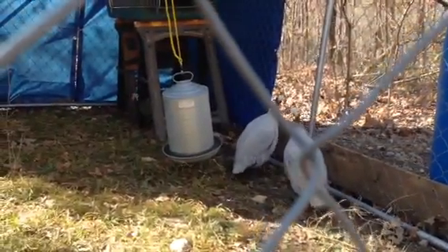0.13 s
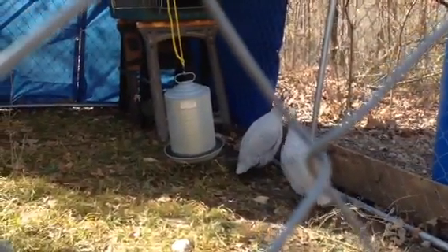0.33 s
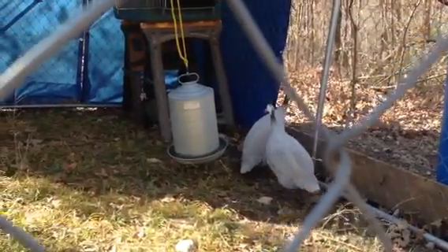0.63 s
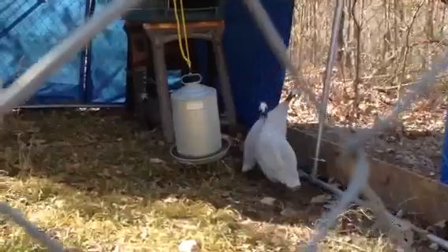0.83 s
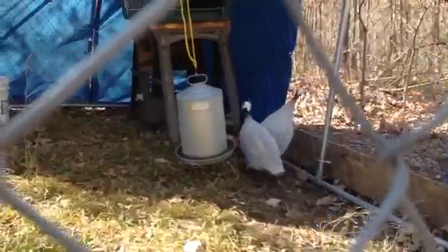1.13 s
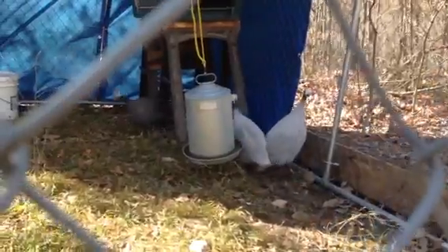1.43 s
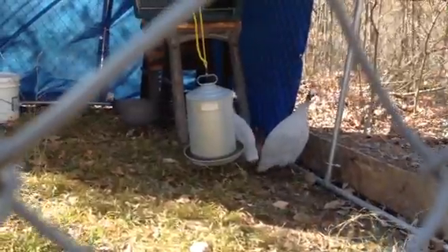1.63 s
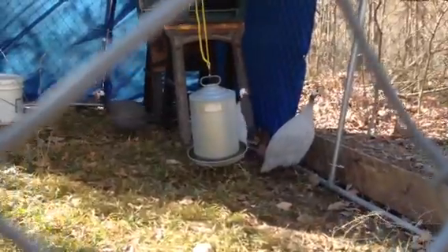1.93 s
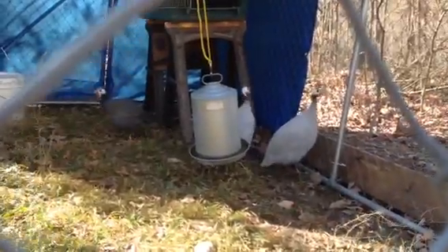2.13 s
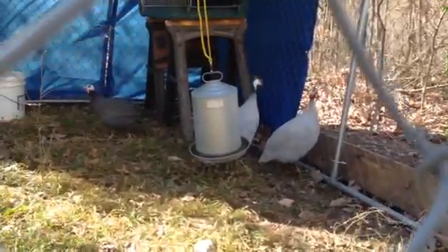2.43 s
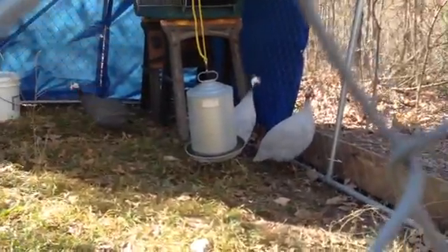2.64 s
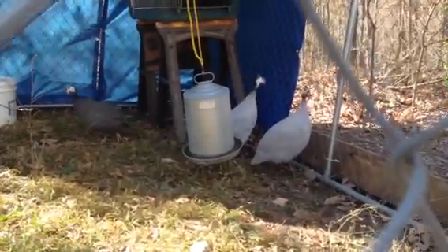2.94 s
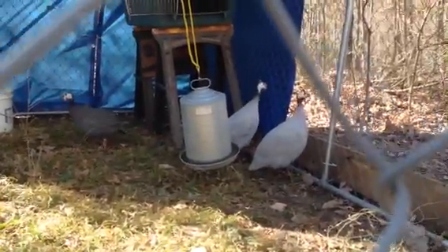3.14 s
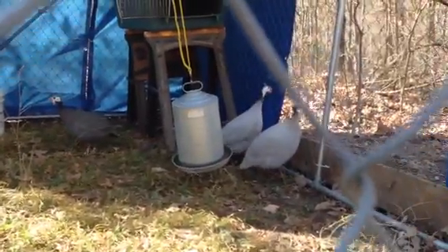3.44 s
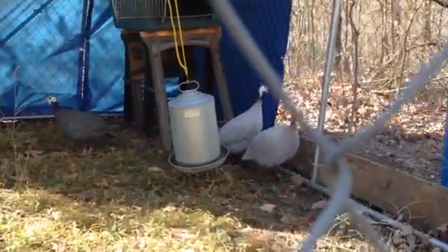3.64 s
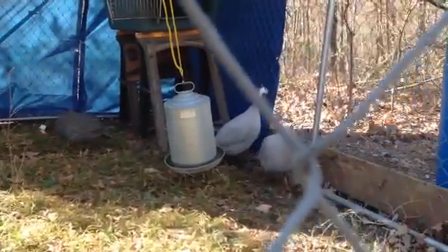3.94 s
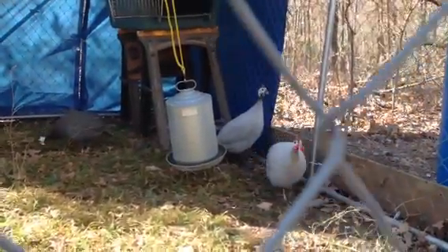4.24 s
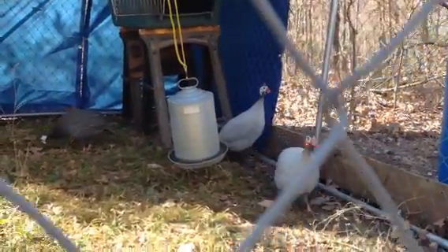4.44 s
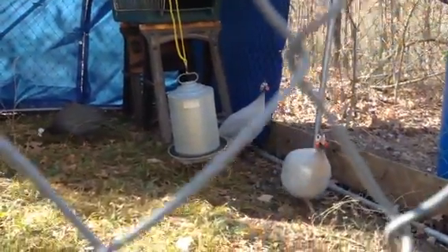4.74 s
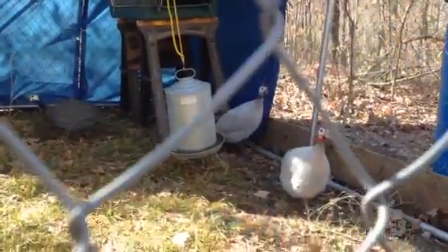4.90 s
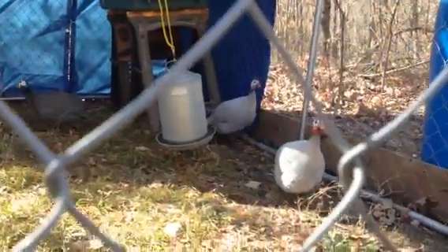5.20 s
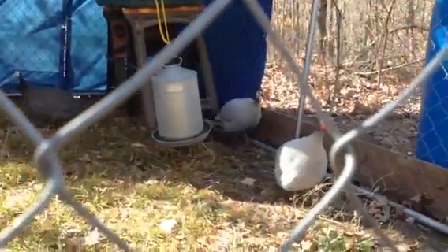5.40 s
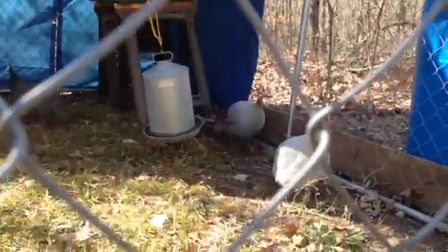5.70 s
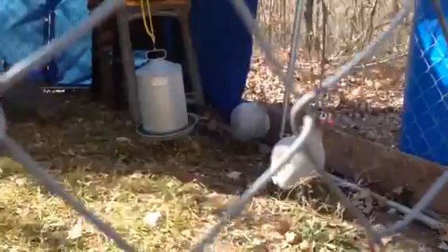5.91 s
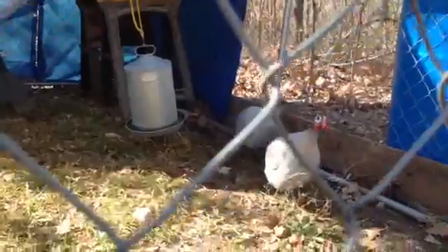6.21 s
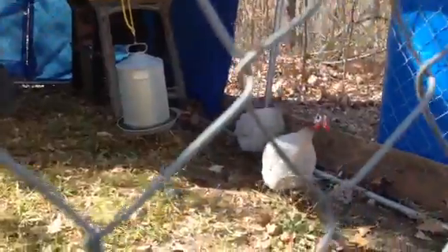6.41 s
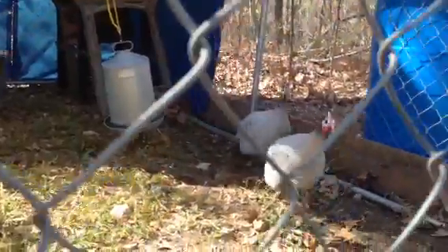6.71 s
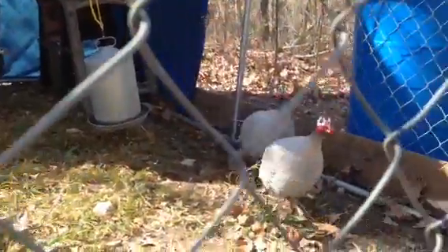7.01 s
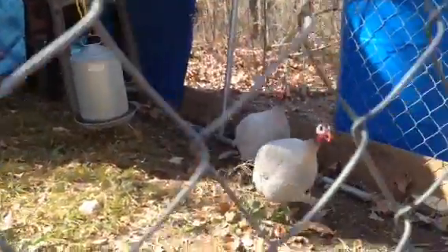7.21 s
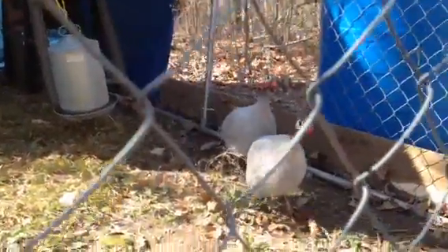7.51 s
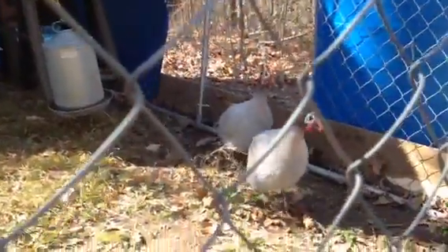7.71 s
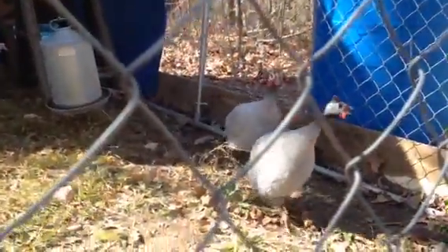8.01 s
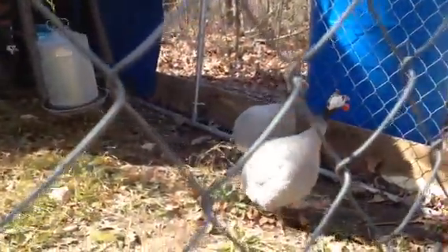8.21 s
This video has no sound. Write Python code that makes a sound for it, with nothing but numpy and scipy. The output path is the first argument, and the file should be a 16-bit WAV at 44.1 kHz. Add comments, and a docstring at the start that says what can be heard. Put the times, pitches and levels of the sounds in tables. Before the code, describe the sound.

Guinea fowl chirp and cluck softly in a small pen, purr briefly, then burst into a long harsh rattling trill with screeches.

```python
"""Guinea fowl in a tarp-walled pen: rising chirps made of whistles and quick pings, then dry clucks from puffs
of air and a soft purr of slower pings. More chirps follow, then a long rattling trill in two parts, about a
hundred pings a second, with screeches of rough air at its peaks. Throughout, noise bursts scratch in dry leaves,
short low thumps bump the hand-held camera, and the pen adds a short echo over a quiet rumble and hiss."""
import sys
import numpy as np
from scipy import signal
from scipy.fft import rfft, irfft, next_fast_len
from scipy.io import wavfile
from scipy.ndimage import uniform_filter1d, map_coordinates

SR = 44100
rng = np.random.default_rng(int(sys.argv[2]) if len(sys.argv) > 2 else 0)


def waveform_to_disk(signal):
    """Save audio, clipped to [-1, 1], as 16-bit WAV at the path in sys.argv[1]."""
    frames = np.transpose(np.atleast_2d(signal))
    scaled = np.clip(frames, -1, 1) * 32767
    samples = np.round(scaled).astype(np.int16)
    wavfile.write(sys.argv[1], SR, samples)


N = 368235
TIME = np.arange(N) / SR

# All levels in the tables are relative: later filters and mixing scale them.
# Throat tables list resonances; each is applied twice, which narrows it.
# throat resonances for the pings of the chirps and first trill: centre_hz, width_hz, level_db
PING_THROAT = [(2350, 410, 0), (2790, 127, 7.5), (3334, 205, -1.5), (3846, 400, 2.5), (4540, 1100, -4.5),
               (5630, 260, 3), (6210, 720, 0.5)]
# throat resonances for the rasp of chirps and trills: centre_hz, width_hz, level_db
TRILL_THROAT = [(363, 37, -8.5), (980, 78, -19.5), (1579, 107, 5.5), (2323, 320, -0.5), (2900, 100, -11),
                (3130, 270, -8), (4420, 1260, -4.5), (5260, 840, -6.5), (6350, 310, -15)]


def chirps():
    """A faint, shaky whistle slides up and breaks into a few quick pings, hoarse at their peak."""
    # one row per chirp: start_s, flutter_db, top_pitch_hz, rasp_db
    chirp_list = [(.001, -56.5, 3700, -69), (0.258, -47, 3560, -64), (0.388, -52.5, 3730, -66),
                  (0.599, -48, 3600, -49), (0.775, -44, 3650, -66), (0.98, -48.5, 3740, -74),
                  (1.102, -46, 3920, -49.5), (1.26, -44, 3740, -50), (1.45, -48.5, 3430, -67),
                  (3.104, -41.5, 3660, -52), (3.312, -39, 3800, -44.5), (3.6, -45, 3600, -43),
                  (3.871, -57.5, 2900, -66), (5.341, -61.5, 3100, -66), (5.552, -52, 3710, -73),
                  (5.865, -40, 3700, -66)]
    whistle, flow, force, cycles, pitch = np.zeros((5, N))
    t = np.arange(SR // 10) / SR
    whistle_shape = amp(np.interp(t, [0, .005, .016, .028, .05], [-17, -6, 0.5, -10.5, -60]))
    swell = amp(np.interp(t, [0, .012, .02, .04, .055, .075, .1], [-66, -18, -7, -8.0, -12.5, -34, -73]))
    hoarse = np.exp(-((t - .026) / 0.0073) ** 2)
    whistle_hz = np.interp(t, [0, .01, .028], [2050, 2300, 3100])
    phase = 2 * np.pi * np.cumsum(whistle_hz) / SR
    # the octave joins in at the hoarse moment
    whistle_wave = whistle_shape * (np.sin(phase) + hoarse * np.sin(2 * phase))
    for s, db, top_hz, rasp_db in chirp_list:
        add(whistle, s, amp(db - 8.5) * whistle_wave)
        add(cycles, s, 112 * t)  # 112 pings per second
        add(pitch, s, np.interp(t, [.01, .024], [2800, top_hz]))
        add(force, s, amp(db) * swell)
        add(flow, s, amp(rasp_db) * hoarse)
    shake = 1 + .6 * wobble(350)
    flutter = pings(cycles, pitch, PING_THROAT, length=.0008, sweep=.08,
                    click_db=-4, ring_db=-8, direct_db=-3)
    return shake * whistle + force * flutter + rasp(flow, TRILL_THROAT)


def clucks():
    """Short runs of puffs through the throat, swelling or fading, and a few pure pips."""
    # runs of puffs: start_s, puff_count, gap_s, first_puff_db, last_puff_db
    cluck_runs = [(.823, 2, 0.012, -49, -53), (1.034, 1, .02, -55, -51.5), (1.139, 2, .017, -55, -43.5),
                  (1.586, 2, .02, -41, -49.5), (1.692, 4, 0.021, -44.5, -51), (1.819, 4, 0.022, -48, -40.5),
                  (1.911, 4, 0.023, -45.5, -45), (2.002, 2, 0.024, -36.5, -40),
                  (2.075, 2, 0.0157, -39, -31.5), (2.189, 2, 0.016, -40, -36), (3.146, 2, .023, -43.5, -48),
                  (3.369, 1, .02, -38.5, -36)]
    # sharp pure tones: middle_s, level_db, pitch_hz, length_s
    pips = [(0.052, -46.5, 2310, 0.0023), (0.832, -37.5, 4170, 0.0026), (1.67, -45.5, 2390, 0.0043),
            (2.408, -43.5, 2500, 0.0026), (2.212, -43, 932, 0.01), (3.3674, -25, 4320, 0.002),
            (3.374, -47, 1520, 0.0033), (3.631, -46.5, 1550, 0.01), (7.725, -25, 2474, 0.005)]
    # throat resonances when clucking: centre_hz, width_hz, level_db
    cluck_throat = [(342, 46, -4.5), (924, 143, -11.5), (1472, 119, 7), (1890, 170, -12), (2400, 390, 4),
                    (2956, 92, -4), (3240, 240, -3.5), (3720, 310, -7), (4254, 430, 2.5), (4750, 700, -7.5),
                    (5680, 550, -6.5)]
    puff_s, width_spread, scatter_db = .0045, .25, 0.5  # typical puff width, and how much puffs differ
    flow, tone = np.zeros((2, N))
    u = np.arange(-SR // 30, SR // 30) / SR
    for s, count, gap, first_db, last_db in cluck_runs:
        for k, db in enumerate(np.linspace(first_db, last_db, round(count))):
            size, width = rng.standard_normal(2)
            this_puff_s = puff_s * np.exp(width_spread * width)
            puff = amp(db + scatter_db * size) / np.cosh(1.8 * u / this_puff_s)
            add(flow, s + k * gap + u[0] - .001, puff)
    for s, db, hz, length in pips:
        pip = np.exp(-(u / length) ** 2) * np.sin(2 * np.pi * hz * u)
        add(tone, s + u[0], amp(db) * pip)
    return amp(0.5) * rasp(flow, cluck_throat) + tone


def purr():
    """A slow train of soft pings with a husky breath, which turns raspy in short churrs."""
    # level of the purr over time: time_s, effort_db
    purr_effort = [(2.35, -72), (2.404, -53.5), (2.46, -61), (2.742, -49.5), (2.748, -59), (2.94, -59),
                   (2.964, -64), (3.168, -45), (3.22, -67)]
    # raspy spells: start_s, length_s, level_db
    churrs = [(2.765, 0.051, -48.5), (2.85, .11, -48), (3.028, 0.035, -48.5), (3.135, 0.055, -49.5)]
    # throat resonances when churring: centre_hz, width_hz, level_db
    purr_throat = [(940, 70, -8), (1430, 137, 6.5), (2184, 320, -0.5), (2420, 76, -12), (2950, 230, -4.5),
                   (4100, 980, -9.5), (4780, 320, -16), (5500, 740, -16)]
    start_s, first_pace, slowing = 2.349, 52.3, 2.5  # pings per s at the start, pings per s lost each second
    age = np.maximum(TIME - start_s, 0)
    cycles = first_pace * age - slowing * age ** 2 / 2
    tone = pulses(cycles, np.full(N, 2500), length=0.0047, sweep=0.02, skirt=0.087,
                  jitter=.0003, scatter_db=3.5)
    husk = rasp(puffs(cycles, sharp=0.37), [(2385, 350, -3), (4140, 550, -19), (5400, 540, -20)])
    churr_gain = spells(churrs, attack=0.021, release=0.014)
    flow = churr_gain * puffs(cycles, sharp=1.06) * amp(wobble(40))
    return amp(phrases([purr_effort]) - 4) * (tone + amp(-2.0) * husk) + rasp(flow, purr_throat)


def trill():
    """Fast pings drag a rasp and a shrill ring as the beak opens, and screech at the peaks."""
    # force behind the pings, one list per trill: time_s, effort_db
    trill_effort = [
        [(5.96, -63.5), (6.48, -45), (6.61, -51), (6.698, -42), (6.752, -47), (7.126, -41), (7.144, -39.5),
         (7.206, -45), (7.412, -35.5), (7.434, -27.5), (7.514, -32.5), (7.56, -71)],
        [(7.68, -68), (7.696, -33), (7.742, -36.5), (7.794, -45), (7.958, -39.5), (8.04, -45), (8.318, -37.5),
         (8.35, -41)],
    ]
    # how far the beak opens, one list per trill: time_s, rasp_db
    beak = [
        [(6.78, -80), (6.838, -54), (6.942, -86), (7.0, -60.5), (7.104, -76), (7.124, -45), (7.146, -42.5),
         (7.274, -73), (7.334, -43), (7.356, -54), (7.512, -43), (7.56, -72)],
        [(7.68, -90), (7.704, -41), (7.716, -35), (7.844, -86.5), (8.054, -43), (8.076, -52), (8.226, -39.5),
         (8.316, -50.5), (8.35, -52)],
    ]
    # pitch of the pings: time_s, pitch_hz
    trill_pitch = [(5.96, 2430), (6.08, 3000), (6.34, 3480), (6.55, 3283), (6.9, 3556), (7.27, 3450),
                   (7.47, 4050), (7.685, 3270), (7.74, 4250), (7.95, 3338), (8.12, 3440), (8.35, 3880)]
    # each trill starts fast and slows: time_s, pings_per_s
    trill_pace = [(5.95, 124), (6.2, 124), (6.38, 110), (6.85, 104), (7.54, 95), (7.68, 115), (7.92, 111),
                  (8.35, 94)]
    # resonances for the second trill's pings, the throat held differently: centre_hz, width_hz, level_db
    late_throat = [(2494, 200, 3.5), (2840, 110, -1.5), (3350, 185, 2.5), (3950, 360, 2), (4670, 720, -9),
                   (6100, 1300, -5)]
    # the open beak's ring: centre_hz, width_hz, level_db
    shrill_ring = [(4776, 290, 3.5), (5330, 250, -18)]
    # screeches: start_s, length_s, level_db
    screeches = [(7.135, 0.017, -42.5), (7.475, 0.041, -29), (7.715, 0.032, -31), (8.203, 0.024, -44),
                 (8.32, 0.033, -34.5)]
    # throat resonances when screeching: centre_hz, width_hz, level_db
    screech_throat = [(341, 73, -0.5), (634.6, 138, -8), (895, 118, 1), (1860, 250, 2.5), (2450, 175, 8),
                      (3130, 150, -3), (4010, 760, 7.5), (4720, 880, -0.5), (5350, 190, 3.5),
                      (5840, 1200, -11), (7680, 1450, -19.5)]
    effort_db, rasp_db = phrases(trill_effort), phrases(beak)
    pitch, = curves(trill_pitch)
    pace, = curves(trill_pace)
    cycles = np.cumsum(pace * (1 + .008 * wobble(40))) / SR  # the pace wanders slightly
    early, late = [pings(cycles, pitch, modes, length=0.00031, sweep=0.11,
                         click_db=-11, ring_db=-11, direct_db=-12.5)
                   for modes in (PING_THROAT, late_throat)]
    throat_change_s = 7.62  # in the pause between the trills
    core = np.where(TIME < throat_change_s, early, late)
    flow = puffs(cycles, sharp=0.69)
    hoarse = rasp(amp(rasp_db + 5.0) * flow, TRILL_THROAT)
    opening = np.clip((rasp_db + 72.5) / 15, 0, 1)
    from_beak = .55  # the shrill ring follows partly the beak, partly the effort
    shrill_db = -1.5 + from_beak * rasp_db + (1 - from_beak) * effort_db
    shrill_db += 3.5 * (TIME > throat_change_s)  # it rings harder in the second trill
    shrill = rasp(opening * amp(shrill_db) * flow, shrill_ring)
    screech_gain = spells(screeches, attack=0.0087, release=0.0034)
    screech = rasp(screech_gain * flow, screech_throat)
    voice = amp(effort_db - 0.5) * core + hoarse + shrill + screech
    stretch_s = .0006 * wobble(9)  # the moving neck bends the whole sound a little
    return map_coordinates(voice, [(TIME + stretch_s) * SR], order=3)


def leaves():
    """Feet rake crackling leaves, scuff the soil below and snap twigs, all as shaped noise."""
    # scratches: start_s, level_db, decay_s, soil_db (relative to the leaves)
    scratches = [(0.099, -56.5, 0.0065, -7), (0.409, -40.5, 0.019, -12.5), (0.423, -43.5, 0.022, -19),
                 (.47, -59.5, 0.07, -4), (0.882, -57.5, 0.044, -8), (1.2, -74, 0.12, 1),
                 (3.509, -60, 0.052, 2.5), (3.735, -63, 0.028, 5), (3.785, -57.5, 0.037, -0.5),
                 (3.98, -61, 0.028, -8.5), (4.905, -52, 0.011, -9), (6.388, -56.5, 0.011, -4.5),
                 (6.826, -59.5, 0.017, 4.5)]
    # spells of restless feet: start_s, length_s, level_db
    stir = [(0, 1.5, -64.5), (2.25, 1.6, -69.5), (6.55, .95, -60.5), (8.15, .2, -65)]
    # twigs snapping: start_s, level_db
    ticks = [(1.529, -50), (3.306, -47), (3.405, -49.5)]
    # colour of the leaves: frequency_hz, level_db (per Hz)
    leaf_colour = [(150, -57), (250, -42), (411, -6), (699, -14), (858, -8), (1170, -14.5), (1430, -8.5),
                   (1760, -33), (2090, -17), (2850, -22.5), (5550, -1.5), (9940, -24.5), (15000, -50)]
    # colour of the soil: frequency_hz, level_db (per Hz)
    soil_colour = [(150, -39), (400, 0), (750, 1.5), (1050, -4), (1450, 0), (2200, -13), (5000, -29)]
    push = amp(-8.5) * spells(stir, attack=.15, release=.15)
    scuff = np.zeros(N)
    t = np.arange(SR // 2) / SR
    for s, db, decay, soil_db in scratches:
        stroke = amp(db + 1.5) * (1 - np.exp(-t / (0.14 * decay))) * np.exp(-t / decay)
        add(push, s - .003, stroke)
        add(scuff, s - .003, amp(soil_db) * stroke)
    for s, db in ticks:
        add(push, s - .001, amp(db + 3) * np.exp(-t / 0.00084))
    # fast random level swings make the noise crackle
    crackle = unit(amp(5.6 * wobble(700))) * rng.standard_normal((2, N))
    return coloured(push * crackle[0], leaf_colour) + coloured(scuff * crackle[1], soil_colour)


def bumps():
    """Each nudge rocks the camera body for a cycle or two, with a knock and a slower sway."""
    # nudges: middle_s, level_db, pitch_hz, length_s, knock_db (relative to the body)
    bump_list = [(0.092, -41, 189, 0.0051, -15), (0.119, -38, 110, .006, -10), (0.139, -17, 143, 0.008, -7),
                 (0.651, -44.5, 191, 0.0046, -12), (0.83, -23, 124, 0.0072, -7),
                 (1.303, -40.5, 205, 0.0054, -7), (1.447, -37, 141, 0.0026, -12),
                 (2.08, -33, 115, 0.0078, -9.5), (2.414, -30.5, 112, 0.011, 6.5),
                 (4.213, -43, 151, 0.0084, -10), (4.401, -41, 140, 0.0048, -4),
                 (5.711, -32.5, 128, 0.0071, -8.5), (6.18, -27.5, 117.5, 0.0098, -8.5),
                 (6.888, -28.5, 123, 0.0086, 3.5), (7.652, -25.5, 128.4, 0.0033, -6.5)]
    out = np.zeros(N)
    u = np.arange(-SR // 16, SR // 16) / SR
    sway = amp(-10.0) * np.sin(2 * np.pi * 75 * u) / np.cosh(u / 0.0068)
    for s, db, hz, length, knock_db in bump_list:
        body = np.cos(2 * np.pi * hz * u) / np.cosh(2.48 * u / length)
        knock = amp(knock_db) * np.sin(2 * np.pi * 2.065 * hz * u) * np.exp(-np.abs(u) / 0.0021)
        add(out, s + u[0], -amp(db) * (body - knock + sway))
    return out


def pen(x, wet_db):
    """Ground, boards and tarps return a short, dense echo: noise that fades at each pitch's own rate."""
    # time the echo takes to fall by 60 dB: frequency_hz, fade_s
    echo_fade = [(200, 0.092), (1500, 0.091), (4000, 0.098), (10000, 0.065)]
    hz, t, z = signal.stft(rng.standard_normal(SR // 3), SR, nperseg=256)
    fade = amp(-60 * t / along(echo_fade, hz)[:, None])
    tail = signal.istft(z * fade, SR, nperseg=256)[1]
    delayed = np.pad(x, (SR // 500, 0))  # the echo starts 2 ms late
    echo = signal.fftconvolve(delayed, tail / np.linalg.norm(tail))[:N]
    return (x + amp(wet_db) * echo) / np.hypot(1, amp(wet_db))


def air():
    """A restless low rumble of noise joins a steady floor of rumble and hiss."""
    # colour of the steady floor: frequency_hz, level_db (per Hz)
    floor_colour = [(12, -47), (20, -15.5), (80, 0.5), (225, -14), (381, -29), (450, -22), (853, -28.5),
                    (953, -28.5), (1040, -31), (1760, -30), (2020, -29), (2980, -29.5), (6140, -29),
                    (7670, -32), (15400, -33.5)]
    gust_colour = [(20, -10), (70, -2), (170, -3.5), (400, -19.5), (1200, -60), (5000, -120)]
    floor = amp(-60) * coloured(rng.standard_normal(N), floor_colour)
    gusts = amp(-64.5 + 2.4 * wobble(34)) * coloured(rng.standard_normal(N), gust_colour)
    return floor + gusts


def pings(cycles, pitch, modes, length, sweep, click_db, ring_db, direct_db):
    """The syrinx's (voice organ's) swept pings, with a breathy edge and a rough ring near their pitch."""
    train = pulses(cycles, pitch, length, sweep, skirt=.06, jitter=.00012, scatter_db=1.2)
    flow = puffs(cycles, sharp=0.63)
    edge = amp(click_db) * flow * rng.standard_normal(N)
    ring_hz = pitch * (1 + .025 * wobble(18))
    rough_tone = unit(wobble(650) * np.cos(2 * np.pi * np.cumsum(ring_hz) / SR))
    ring = amp(ring_db) * flow * rough_tone
    return steady(unit(throat(train + edge, modes)) + amp(direct_db) * train + ring)


def pulses(cycles, pitch, length, sweep, skirt, jitter, scatter_db):
    """One short upward-swept ping of the syrinx at each whole cycle, rms 1."""
    out = np.zeros(N)
    u = np.arange(-SR // 140, SR // 140) / SR
    beats = np.flatnonzero(np.diff(np.floor(cycles)) > 0)
    shape = (np.exp(-np.abs(u) / length) + skirt) * np.hanning(len(u))
    for i, (late, size, tune) in zip(beats, rng.standard_normal((len(beats), 3))):
        hz = pitch[i] * (1 + 0.034 * tune) * (1 + sweep * np.tanh(u / (2 * length)))
        turn = np.cumsum(hz) / SR
        wave = np.cos(2 * np.pi * (turn - turn[len(u) // 2]))  # crest in the middle
        add(out, i / SR + u[0] + jitter * late, amp(scatter_db * size) * shape * wave)
    return unit(out)


def puffs(cycles, sharp):
    """One puff of air at each whole cycle, rms 1."""
    return unit(np.exp(sharp * np.cos(2 * np.pi * cycles)))


def rasp(flow, modes):
    """Turbulent air, shaped by the flow, rings the throat."""
    return throat(flow * rng.standard_normal(N), modes)


def throat(x, modes):
    """x through steep-sided resonances; their alternating signs leave dark valleys between them."""
    def response(hz):
        total = 0
        for k, (centre, width, db) in enumerate(modes):
            damping = 1j * hz * width
            resonance = damping / (centre * centre - hz * hz + damping)
            total = total + (-1) ** k * amp(db) * resonance ** 2
        return total
    return filtered(x, response)


def coloured(x, spectrum):
    """x with the colour of (frequency_hz, level_db) points."""
    return filtered(x, lambda hz: amp(along(spectrum, hz)))


def filtered(x, response):
    """x through a response of frequency, scaled to pass white noise at equal power."""
    m = next_fast_len(N + SR // 4)
    h = response(np.fft.rfftfreq(m, 1 / SR))
    return irfft(rfft(x, m) * h / np.sqrt(np.mean(np.abs(h) ** 2)), m)[:N]


def spells(rows, attack, release):
    """Gain of (start_s, length_s, level_db) spells: each swells, holds and dies away."""
    gains = []
    for s, length, db in rows:
        before = np.minimum(TIME - s, 0)
        after = np.maximum(TIME - s - length, 0)
        gains.append(amp(db) * np.exp(before / attack - after / release))
    return np.max(gains, axis=0)


def phrases(tables):
    """A level in dB through several phrases, -120 outside them."""
    return np.max([curves(rows, outside=-120)[0] for rows in tables], axis=0)


def curves(rows, outside=None):
    """One value per sample for each column after the time."""
    s, *cols = np.transpose(rows)
    return [np.interp(TIME, s, c, outside, outside) for c in cols]


def along(points, hz):
    """Values between (frequency_hz, value) points on a log frequency axis."""
    f, v = np.transpose(points)
    return np.interp(np.log(hz + 1), np.log(f + 1), v)


def wobble(rate):
    """A smooth random curve through rate random points a second."""
    return map_coordinates(rng.standard_normal(int(N * rate / SR) + 4), [TIME * rate], order=2)


def add(track, s, piece):
    """Mix a piece into the track from time s, cut off at the track's ends."""
    i = round(s * SR)
    part = piece[max(-i, 0):max(N - i, 0)]
    track[max(i, 0):max(i, 0) + len(part)] += part


def steady(x):
    """x held near rms 1 over a few pulses."""
    power = uniform_filter1d(uniform_filter1d(x * x, size=1300), size=900)
    return x / np.sqrt(np.abs(power) + 1e-9)


def unit(x):
    """x scaled to rms 1."""
    return x / np.sqrt(np.mean(x ** 2) + 1e-20)


def amp(db):
    """Decibels to a plain gain."""
    return 10 ** (np.asarray(db) / 20)


def scene():
    """Birds and leaves echo in the pen; bumps and air are added without echo."""
    birds = chirps() + clucks() + purr() + trill()
    return (pen(birds + leaves(), wet_db=-5.5) + bumps() + air())[None]


def record(dry):
    """The camera keeps nothing above its band limit."""
    top_hz = 15400
    return irfft(rfft(dry) * (np.fft.rfftfreq(N, 1 / SR) < top_hz), N)


dry = scene()
out = record(dry)
waveform_to_disk(out)
```